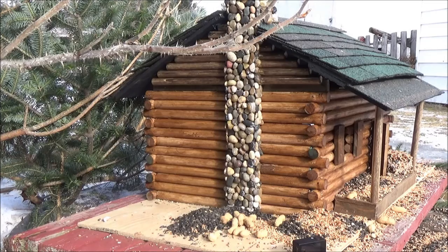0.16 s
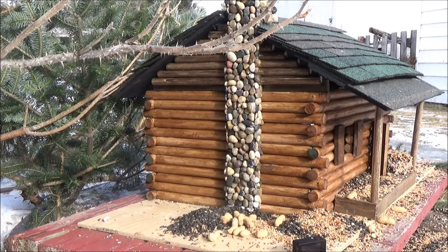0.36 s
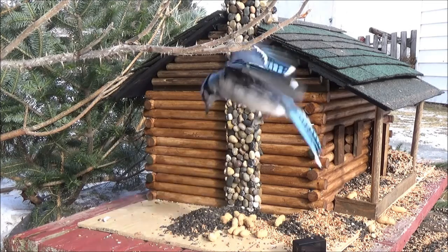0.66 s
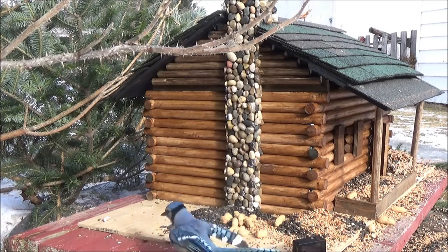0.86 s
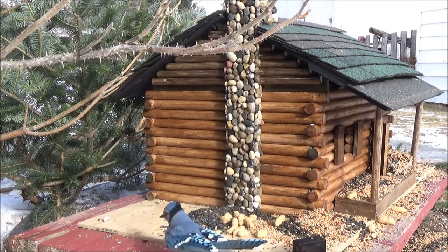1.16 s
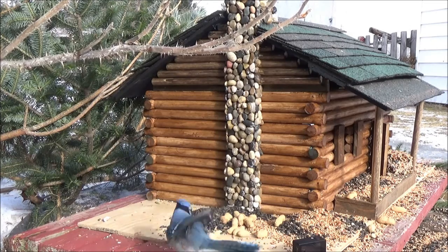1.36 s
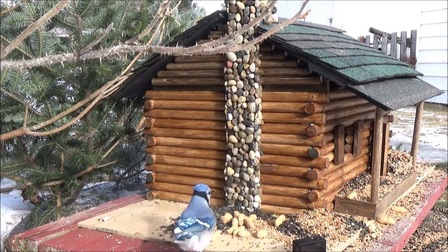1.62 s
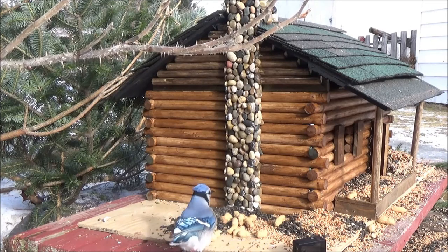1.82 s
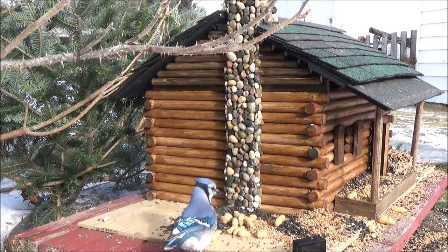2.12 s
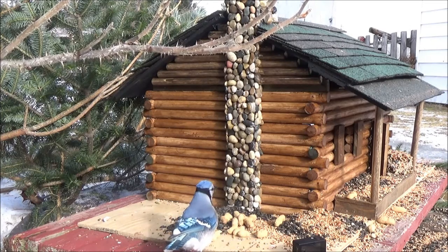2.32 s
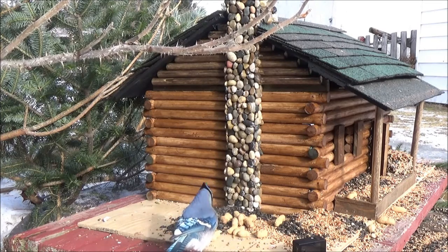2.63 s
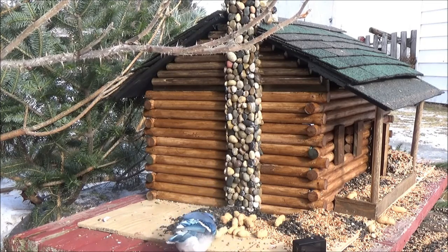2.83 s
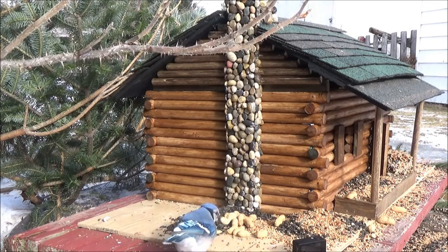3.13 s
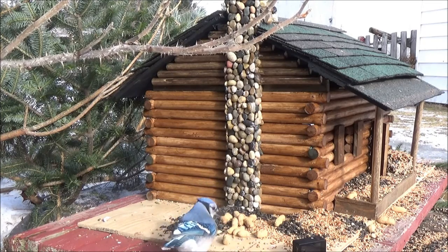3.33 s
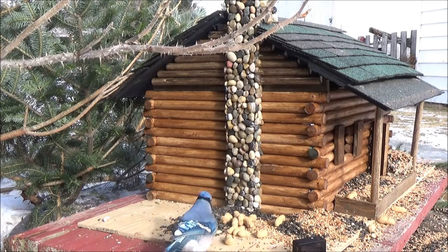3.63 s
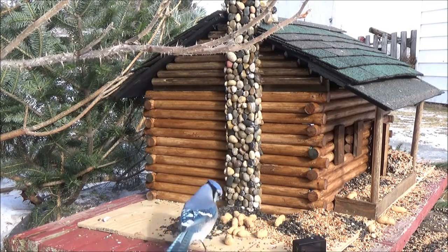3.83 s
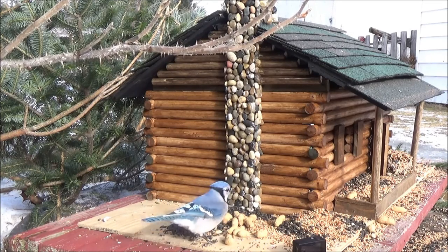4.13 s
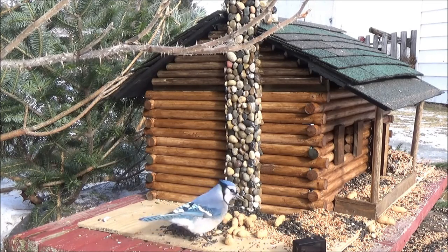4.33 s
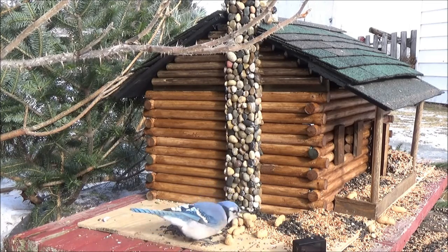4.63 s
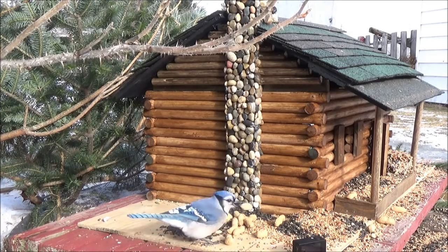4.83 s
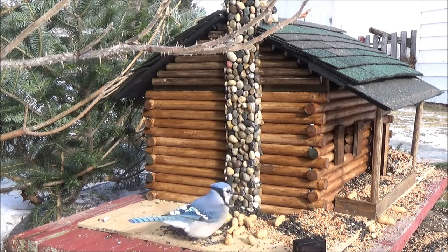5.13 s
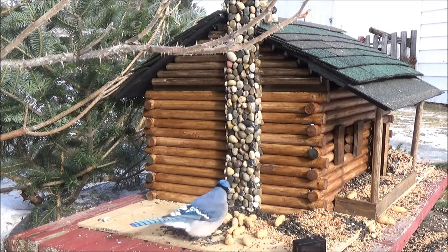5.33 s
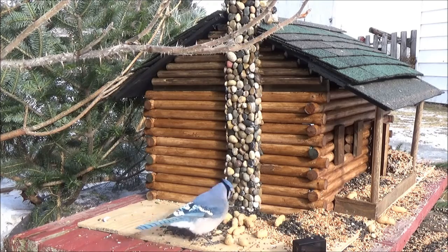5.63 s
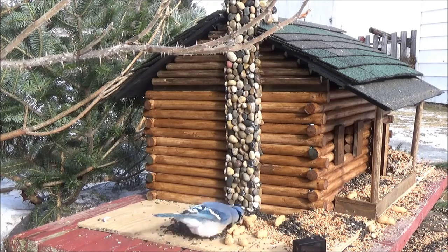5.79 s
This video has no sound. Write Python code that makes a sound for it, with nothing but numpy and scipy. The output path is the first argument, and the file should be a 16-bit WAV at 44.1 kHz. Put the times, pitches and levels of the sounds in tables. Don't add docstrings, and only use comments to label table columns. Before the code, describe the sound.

Outdoors, close stereo microphones pick up a bird's quick feathery wingbeats as it lands on a seed-strewn board. Sparse husk snaps and scuffs follow, with a faint rapid lens-motor ticking. Two very hard pecks crack, slightly distorted, then clusters of seed clicks, knocks and another loud peck. Far road noise fades gently behind, and the level dips after that late peck.

```python
import sys
import numpy as np
from scipy import signal
from scipy.fft import rfft, irfft
from scipy.io import wavfile

SR = 44100
rng = np.random.default_rng(int(sys.argv[2]) if len(sys.argv) > 2 else 0)


def master_out(mix):
    frames = np.transpose(np.atleast_2d(mix))
    ceiling = np.clip(frames, -1, 1)
    pcm = np.round(ceiling * 32767).astype(np.int16)
    wavfile.write(sys.argv[1], SR, pcm)


def magnitude_from_level(level_db):
    exponent = np.asarray(level_db, float) / 20
    return 10 ** exponent


N = 262836


def rms_one(x):
    return x / np.sqrt(np.mean(x ** 2) + 1e-20)


def peak_one(x):
    return x / (np.max(np.abs(x)) + 1e-20)


def at_hz(points, hz):
    table = np.array(points)
    return np.interp(np.log(hz), np.log(table[:, 0]), table[:, 1])


def drift(rate):
    hop = 40
    r = np.exp(-2 * np.pi * hop * rate / SR)
    source = rng.standard_normal(N // hop + 2002)
    slow = signal.lfilter([1], [1, -2 * r, r * r], source)[2000:]
    return np.interp(np.arange(N) / hop, np.arange(len(slow)), rms_one(slow))


# f/Hz, side minus mid level/dB
STEREO_WIDTH = [(60, -27), (180, -27), (310, -12), (700, -10), (1650, -4.5), (4000, -3.5), (8640, -7),
                (15000, -37)]


def coloured(spectrum, source=None, narrow_db=0):
    if source is None:
        source = rng.standard_normal((2, N))
    hz = np.maximum(np.fft.rfftfreq(N, 1 / SR), 1)
    low_edge = np.minimum(1, (hz / spectrum[0][0]) ** 4)
    high_edge = np.minimum(1, (spectrum[-1][0] / hz) ** 4)
    width = magnitude_from_level(at_hz(STEREO_WIDTH, hz) - narrow_db)
    gain = magnitude_from_level(at_hz(spectrum, hz)) * low_edge * high_edge * [np.ones_like(hz), width]
    mid, side = irfft(gain * rfft(source), N)
    return rms_one(np.array([mid + side, mid - side]))


def ring(clicks, hz, t60):
    r = magnitude_from_level(-60 / (t60 * SR))
    w = 2 * np.pi * hz / SR
    return signal.lfilter([0, np.sin(w)], [1, -2 * r * np.cos(w), r * r], clicks + 1e-18)


def swell(rise_s, fall_s, size, round_off=1):
    t = np.arange(size) / SR
    rise_s = max(rise_s, 1e-4)
    fall = np.maximum(t - rise_s, 0) / max(fall_s, 1e-4)
    rise = np.sin(np.pi / 2 * np.minimum(t / rise_s, 1)) ** 2
    return rise * np.exp(-fall ** round_off)


def add(out, s, piece):
    i = round(s * SR)
    out[..., i:i + piece.shape[-1]] += piece[..., :N - i]


def between(x, low_hz, top_hz):
    band = [low_hz, min(top_hz, .45 * SR)]
    return signal.sosfilt(signal.butter(2, band, "band", fs=SR, output="sos"), x)


def grains(per_s, spread_db, size):
    chance, big, sign = rng.random((3, size))
    height = magnitude_from_level(-spread_db * np.log(np.maximum(big, .01)))
    return (chance < per_s / SR) * height * np.sign(sign - .5)


# f/Hz, level/dB per Hz
ROAD = [(250, -11), (460, -8), (700, -1.5), (870, 1), (1050, -1.5), (1300, -7.5), (1800, -38)]
RUMBLE = [(25, -27), (47, -20), (60, -4), (75, -9), (155, 1), (230, -4.5), (400, -8.5), (600, -24)]
TYRES = [(800, -33), (1050, -6.5), (1300, 3), (1600, 0.5), (1850, -3.5), (2050, -8.5), (2400, -16),
         (3600, -34)]
HISS = [(1500, -4.5), (2500, 3.5), (4000, -1), (6500, -4), (9400, -5.5), (12500, -8.5), (15000, -9),
        (16500, -23.5)]
# f/Hz, bandwidth/Hz, level/dB
WHINE = [(7800, 120, -71), (9300, 296, -71), (60.4, 3.5, -76)]
# t/s, level/dB against its nearest
TRAFFIC = [
    (0, 1.5),
    (.3, -0.5),
    (.9, -.5),
    (1.4, -4),
    (2.2, -5),
    (2.85, -7.5),
    (3.6, -6),
    (4.3, -7.5),
    (4.9, -8),
    (5.96, -7),
]


def background():
    vehicle_db = np.interp(np.arange(N) / SR, *np.transpose(TRAFFIC))
    wash = np.zeros(N)
    add(wash, 0.57, swell(rise_s=0.3, fall_s=0.14, size=SR))

    def level(db, vehicle_share, wash_db):
        return db + vehicle_share * vehicle_db + wash_db * wash

    road_db = level(-44.5, 0.24, 3) + 0.51 * drift(13) + 0.5
    out = magnitude_from_level(road_db) * coloured(ROAD)
    rumble_db = level(-52, 0.28, 4.5) + 0.2
    out += magnitude_from_level(rumble_db) * coloured(RUMBLE)
    tyre_db = level(-41.5, 1, 0.7) + 0.26 * drift(11.0) + 1.0
    out += magnitude_from_level(tyre_db) * coloured(TYRES)
    hiss_db = level(-51, 0.18, 6.1) + 1.0 * drift(0.9) + 1.33
    out += magnitude_from_level(hiss_db) * coloured(HISS)
    for hz, width_hz, db in WHINE:
        out += magnitude_from_level(db) * rms_one(ring(rng.standard_normal(N), hz, 3.2 / width_hz))
    return out


HUSK_EDGES_HZ = 3100, 6200, 11000
# f/Hz, bandwidth/Hz, lift (ratio)
HUSK_DULL = [(3680, 1900, 1.0), (5050, 3000, 1), (5900, 1500, 0.98)]
HUSK_BRIGHT = [(7730, 1800, 1.37), (9250, 860, 1.05)]


def husks(contact):
    low_hz, split_hz, top_hz = HUSK_EDGES_HZ
    bands = [(split_hz, top_hz, HUSK_BRIGHT), (low_hz, split_hz, HUSK_DULL)]
    parts = []
    for bottom_hz, upper_hz, lifts in bands:
        wide = between(contact, bottom_hz, upper_hz)
        lifted = [lift * signal.lfilter(*signal.iirpeak(hz, hz / width_hz, fs=SR), wide)
                  for hz, width_hz, lift in lifts]
        parts.append(wide + sum(lifted))
    return parts


# t/s, rms level/dB, rise/s, fall/s
BRUSHES = [(0.035, -33.5, 0.0029, 0.01), (.062, -38, 0.0029, 0.0088), (.147, -50, .004, 0.0072),
           (0.174, -44, .003, 0.0079), (.853, -17.5, 0.004, .0075), (.885, -40.5, .0099, 0.049),
           (1.295, -33, 0.0055, 0.013), (1.375, -40, 0.012, 0.096), (1.965, -48, .004, .008),
           (2.025, -47, 0.0051, 0.011), (2.593, -38, 0.007, 0.011), (2.803, -46, .004, 0.016),
           (2.91, -43.5, 0.0032, 0.032), (3.82, -42.5, .03, 0.045), (4.654, -27, 0.0027, 0.0028),
           (4.722, -48, 0.0074, .0082), (4.978, -42, 0.003, 0.0049), (5.15, -46, .005, .03),
           (5.783, -36, .013, 0.0072), (5.814, -29, .0068, 0.0071)]
# t/s, rms level/dB of bright husk, dull husk, board, fall/s
SCUFFS = [(1.112, -47, -48, -55, .004), (1.44, -31, -31.5, -34, 0.0053), (1.531, -38, -34, -36, 0.012),
          (2.432, -59, -55, -52, .012), (3.0, -49.5, -55, -33.5, 0.011), (3.942, -28, -33, -27.5, 0.0044),
          (3.953, -40, -56, -38, 0.013), (3.980, -29, -33, -30.5, 0.0063), (4.448, -44, -43, -41, .012),
          (4.468, -42, -54, -36, 0.0094), (4.545, -35, -48, -33, .0068), (4.554, -29, -30, -27.5, .004),
          (4.743, -33, -36, -32, 0.0057), (5.826, -27, -20.5, -22, 0.0065), (5.836, -38, -30, -23.5, 0.016),
          (5.853, -41.5, -40, -43, 0.053), (5.905, -44, -36, -52, 0.012)]


def all_scuffs():
    dull_db, board_db = -5.5, -7
    light = [(s, db, db + dull_db, db + board_db, rise_s, fall_s) for s, db, rise_s, fall_s in BRUSHES]
    heavy = [(*row, 0.0032, fall_s) for *row, fall_s in SCUFFS]
    return sorted(light + heavy)


BOARD_LOW_HZ = 770


def scuffs():
    out = np.zeros(N)
    for s, bright_db, dull_db, board_db, rise_s, fall_s in all_scuffs():
        grit = grains(9000, 2.5, size=5000)
        bright, dull = husks(grit)
        mix = magnitude_from_level(bright_db) * rms_one(bright) + magnitude_from_level(dull_db) * rms_one(dull)
        mix += magnitude_from_level(board_db) * rms_one(between(grit, BOARD_LOW_HZ, 3600))
        add(out, s, magnitude_from_level(-2.0) * swell(rise_s, fall_s, size=5000) * mix)
    return out


def pushed_resonances(rows, split, share):
    out = np.zeros(N)
    push = swell(.0002, .0001, size=2500)
    for s, peak_db, hz, t60 in rows:
        note = sum(ring(push, hz * part / np.mean(split), share * t60) for part in split)
        add(out, s, magnitude_from_level(peak_db) * peak_one(between(note, hz / 2, hz * 2)))
    return out


# t/s, peak level/dB, f/Hz, t60/s
FLAPS = [(0.634, -24.5, 590, 0.0046), (.750, -29, 556, 0.036), (.750, -38, 910, 0.016),
         (.808, -26, 600, 0.022), (.858, -26, 1004, 0.075), (1.443, -29, 1180, 0.046),
         (.036, -24.5, 9900, 0.022), (.174, -37, 9460, .015), (2.436, -41, 6750, 0.043),
         (3.274, -7, 2180, 0.018), (3.274, -12, 3250, 0.038), (3.3015, -8, 1750, 0.02),
         (4.656, -25, 1700, 0.019), (5.007, -37, 460, 0.055), (5.828, -9.5, 5900, 0.024),
         (5.828, -33, 315, 0.042), (5.8265, -18.5, 895, 0.012), (5.775, -18, 1910, 0.022),
         (.444, -42, 620, .025),
    (0.691, -35, 550, .025),
    (.718, -34, 425, .03),
    (0.794, -39, 470, .02),
]


def flaps():
    return pushed_resonances(FLAPS, split=[1], share=1)


# t/s, rustle rms level/dB, bright edge level/dB against rustle, rise/s, fall/s
STROKES = [(.332, -40, 1, 0.024, 0.012), (.368, -46, -7, .012, 0.06), (0.411, -36.5, -5.5, 0.013, 0.017),
           (.432, -38.5, -10.5, 0.014, 0.05), (.486, -54, -3, .011, 0.081),
           (0.552, -36.5, -3, 0.031, 0.018), (.597, -38.5, -8, 0.017, 0.02),
           (0.633, -32.5, -3.5, 0.013, 0.03), (.675, -38, -5, 0.014, 0.037), (.711, -32.5, -1, .023, 0.012),
           (.740, -39.5, 3.5, .014, 0.02), (.772, -40, -4, 0.013, 0.026), (.804, -34.5, 0, .016, 0.023)]
# f/Hz, level/dB per Hz
FEATHERS = [(1300, -10), (2000, -5), (2900, -6), (4400, -4), (5800, -3.5), (7000, -5), (8500, -18.5)]
EDGES = [(6000, -25), (7500, -4), (9200, 3), (10500, 0.5), (12500, -3.5), (15000, -7), (16200, -18)]


def wings():
    rustle, edge, puff = np.zeros((3, N))
    for s, rustle_db, edge_db, rise_s, fall_s in STROKES:
        shape = swell(rise_s, fall_s, size=6000, round_off=1.7)
        add(rustle, s, magnitude_from_level(rustle_db) * shape)
        add(edge, s, magnitude_from_level(rustle_db + edge_db) * shape)
        add(puff, s, magnitude_from_level(rustle_db - 7) * shape)
    vanes = grains(10000, 1.9, size=2 * N).reshape(2, N) * magnitude_from_level(2.4 * drift(220))
    air = [(160, -27), (300, -1), (520, 1.0), (1000, -2.5), (1800, -7.0)]  # f/Hz, level/dB per Hz
    out = rustle * coloured(FEATHERS, vanes, narrow_db=36)
    out = out + edge * coloured(EDGES, vanes, narrow_db=0)
    return out + puff * magnitude_from_level(2.1 * drift(65)) * coloured(air, narrow_db=19)


# t/s, peak level/dB, f/Hz, t60/s
SLAPS = [(.352, -28, 9800, .012), (.428, -29, 10000, .01), (.576, -27, 9200, .01), (.580, -32, 6500, .01),
         (.645, -26, 4500, .012), (.716, -27, 6000, .01), (.733, -20, 8800, .015), (.737, -23, 5500, .012),
         (.810, -27, 9000, .012), (.823, -26, 9200, .015), (.899, -33, 8000, .012)]
# t/s, peak level/dB, f/Hz, t60/s
RINGS = [(3.2738, -22, 1230, 0.045), (3.2728, -11, 4870, .02), (3.2735, -6, 7850, .018),
         (3.273, -21, 10800, .01), (3.3015, -12.5, 1240, 0.068), (3.3012, -19, 2500, .03),
         (3.3008, -12, 3320, .03), (3.3007, -2.5, 7930, .025), (3.341, -27, 7900, .02),
         (3.946, -22, 10900, .01), (3.949, -26, 1310, .015), (3.953, -24, 4500, .012),
         (3.9835, -24, 7850, .012), (4.0065, -25, 4200, .012), (4.0145, -27, 5900, .01),
         (4.0548, -25, 3950, 0.013), (4.0795, -34, 7500, .006), (4.1165, -26, 3970, .012),
         (4.167, -22, 3880, .018), (4.532, -30, 9700, .015), (4.5433, -10, 6800, .008),
         (4.5432, -20, 4640, .008), (4.545, -24, 9700, .015), (4.552, -25, 9800, .012),
         (4.549, -28, 8000, .012), (4.6575, -27, 9900, .02), (4.660, -22, 7900, .015),
         (4.671, -22, 8700, .008), (4.743, -17, 7500, 0.057), (4.7455, -23, 9700, .02),
         (4.730, -35, 7800, .02), (4.733, -35, 7700, .015), (4.7125, -36, 8700, .006),
         (4.682, -36, 8400, .008), (5.0072, -10.5, 4100, .02), (5.0072, -10, 5140, .018),
         (5.0072, -17, 7500, .012), (5.0082, -13.5, 1700, 0.03), (5.0086, -17, 1210, .035),
         (5.0135, -22, 6930, .008), (5.7685, -25, 3800, .01), (5.773, -19, 5300, .01),
         (5.7755, -17, 3870, .012), (5.794, -32, 9200, .01), (5.833, -25, 9300, .012),
         (5.835, -29, 3600, .012), (5.8375, -25, 2000, .02), (5.842, -29, 6200, .015),
         (5.845, -29, 2500, .025), (5.847, -27, 4600, .015), (5.858, -33, 5600, .012),
         (5.927, -23.5, 4550, .03), (5.927, -32, 8800, .008),
         (3.279, -22, 8600, .012), (3.284, -26, 2500, .02), (3.288, -28, 3300, .015),
          (3.292, -23, 2150, .02), (3.296, -28, 4500, .01), (3.306, -24, 8800, .01),
          (3.310, -25, 2300, .015), (3.318, -29, 1500, .025), (3.329, -33, 3200, .025),
          (5.009, -21.5, 840, .03), (5.017, -33, 4000, .012), (5.855, -33, 1510, .03),
          (5.914, -36, 6000, .01)]
CLUSTER = [.972, 1, 1.021, 1.052]


def shells_and_tips():
    return pushed_resonances(SLAPS + RINGS, split=CLUSTER, share=.65)


# t/s, peak level/dB of bright crack, dull crack, board knock, contact/s
PECKS = [(0.6362, -33, -18, -22.5, 0.00084), (2.798, -28, -26, -24.5, 0.0025),
         (3.2723, -1.5, -8.5, -3.5, 0.0022), (3.3004, -1, -7.5, -2.5, 0.001),
         (3.339, -25, -26, -18.5, 0.0017), (3.9456, -20, -20, -27, 0.0019),
         (3.982, -17, -17.5, -27, 0.00092), (4.1666, -24, -21.5, -24, 0.0012),
         (4.4694, -27, -25, -32, 0.00082), (4.53, -27, -30, -31, 0.002), (4.5428, -8, -9.5, -21.5, 0.00095),
         (4.5605, -18, -21.5, -23, 0.00088), (4.656, -17.5, -28, -37, 0.00068),
         (4.661, -24, -28, -30, 0.00063), (4.742, -15.5, -31, -32, 0.0008),
         (4.9177, -19.5, -20, -23, .0012), (5.007, -5, -3, -16, 0.00077), (5.7733, -18.5, -17, -22, 0.0027),
         (5.818, -26, -24, -33, 0.00084), (5.8278, -16, -27, -20, 0.0022), (5.842, -21, -20, -31, 0.0015),
         (5.8466, -25, -17, -26, 0.00205), (5.9258, -30, -27, -33, 0.001)]
# t/s, peak level/dB, contact/s
SEEDS = [(0.8578, -29, 0.0027), (3.9455, -21, 0.0026), (3.9771, -12.5, 0.0007), (4.006, -24, 0.00071),
         (4.054, -26, 0.00033), (4.098, -31, 0.0016), (4.101, -32, 0.0016), (4.116, -29, 0.0011),
         (4.199, -30.5, 0.0012), (4.4477, -34, 0.002), (4.478, -20.5, 0.00023), (5.214, -33.5, 0.00052),
         (5.768, -20, 0.0012), (5.81, -28, 0.0014), (5.8705, -23, 0.00088)]
# t/s, peak level/dB, contact/s
KNOCKS = [(2.906, -23.5, 0.0019), (3.9933, -28, 0.0007), (4.03, -32, 0.00073), (4.0803, -31, 0.00044),
          (4.496, -37, 0.002), (4.681, -43, 0.0022), (5.0125, -22, 0.001), (5.0598, -27, 0.0025),
          (5.0706, -24.5, 0.00039), (5.1053, -21.5, 0.0028), (5.757, -30, .002)]
# t/s, peak level/dB, contact/s, left-right level/dB
SNAPS = [(0.9956, -27, 0.00057, -1.1), (1.023, -33, 0.00062, -4), (1.1164, -16.5, 0.00066, -.7),
         (1.2684, -34, .0004, -1.9), (1.2934, -23, 0.0022, -9), (1.3296, -31, 0.00051, -11),
         (1.44, -26, 0.0033, 0), (1.531, -25, 0.00076, -.5), (1.537, -23.5, 0.0033, 4),
         (3.0113, -14.5, 0.0012, -1.5), (3.209, -25, .0012, -2.5), (3.805, -30.5, .001, -4.6),
         (4.014, -21, 0.0012, 3.5), (4.039, -33, 0.00033, 2), (4.2032, -33, .0005, -4.7),
         (4.3196, -33.5, 0.0005, -5), (4.4253, -28, 0.0005, -7), (4.43, -32, .001, .1),
         (4.5398, -25, 0.00062, -15), (4.6714, -14.5, 0.00026, -.8), (4.7636, -24, 0.00026, 6),
         (4.975, -26.5, 0.00065, -5), (4.9851, -38, .00061, 1.3), (5.1433, -31, 0.0005, -1.1),
         (5.3854, -34, .0004, 3), (5.409, -31, 0.0016, -.7), (5.475, -20.5, 0.00011, -3),
         (5.6404, -30, 0.00047, -1.8), (5.834, -14, 0.0024, -3)]
# t/s, left-right level/dB
PERCH = [
    (.6, -.5),
    (3.3, 0.5),
    (3.95, -2),
    (4.2, 1.5),
    (4.55, 1.5),
    (4.9, 1),
    (5.0, 2),
    (5.8, 1),
]


def all_taps():
    seeds = [(s, db - 9.5, db, db - 11, contact_s) for s, db, contact_s in SEEDS]
    knocks = [(s, db - 11.5, db - 10.5, db, contact_s) for s, db, contact_s in KNOCKS]
    at_bird = [(*row, np.interp(row[0], *np.transpose(PERCH))) for row in seeds + knocks + PECKS]
    snaps = [(s, db, db - 10.5, db - 15, contact_s, pan_db) for s, db, contact_s, pan_db in SNAPS]
    return sorted(snaps + at_bird)


def struck(contact, modes, strength_db):
    return peak_one(sum(magnitude_from_level(db + own_db) * ring(contact, hz, t60)
                        for (hz, db, t60), own_db in zip(modes, strength_db)))


# f/Hz, level/dB, t60/s
BOARD = [(886, -35, 0.0041), (990, -45, 0.0082), (1200, 3, 0.022), (1490, 9, 0.0062), (1760, 7.5, 0.0078),
         (2060, 5, 0.0069), (2355, -6, 0.02), (2600, -10, 0.011), (3250, -9, 0.024)]


def taps():
    out = np.zeros((2, N))
    lead_s, lead_db = .003, -25
    size = 2000
    for s, bright_db, dull_db, knock_db, contact_s, pan_db in all_taps():
        noise = rng.standard_normal(size)
        shape = swell(0.72 * contact_s, contact_s, size, round_off=0.86)
        blow = signal.unit_impulse(size) * 4 + .5 * noise * shape
        knock = struck(blow, BOARD, 2.2 * rng.standard_normal(len(BOARD)))
        knock = between(between(knock, BOARD_LOW_HZ, 6200), 880, 6000)
        scrape = magnitude_from_level(lead_db) * swell(lead_s, contact_s, size)
        add(scrape, lead_s, shape[:size - round(lead_s * SR)])
        bright, dull = husks(noise * scrape)
        crack = magnitude_from_level(bright_db) * peak_one(bright) + magnitude_from_level(dull_db) * peak_one(dull)
        pan = magnitude_from_level(np.array([[.5], [-.5]]) * pan_db)
        add(out, s - lead_s, pan * crack)
        add(out, s + .45 * contact_s, magnitude_from_level(knock_db) * pan * peak_one(knock))
    return out


MOTOR_SKIPS = [7, 31, 39, 53, 67]
# t/s, level/dB
MOTOR_RETURN = [
    (.93, 1),
    (1.2, 3),
    (1.85, 3),
    (1.95, 0),
    (2.4, 0),
    (2.55, 1.5),
    (2.9, -0.5),
    (3.9, 0.5),
]


def lens_motor():
    start_s, steps_per_s, tone_hz = .9288, 29.97, 2952
    weak_steps, weak_db = [16, 76, 86], -7
    steps = np.delete(np.arange(90), MOTOR_SKIPS)
    at = ((start_s + steps / steps_per_s) * SR).astype(int)
    early = at - 240
    returning = steps % 2 == 1
    pull_db = returning * np.interp(at / SR, *np.transpose(MOTOR_RETURN))
    pull_db = pull_db + weak_db * np.isin(steps, weak_steps)
    kicks = np.zeros(N)
    kicks[at] = magnitude_from_level(pull_db + 1.2 * rng.standard_normal(len(at)))
    kicks[early] = .55 * magnitude_from_level(pull_db + 1.5 * rng.standard_normal(len(at)))
    kicks[at[returning]] *= -1
    kicks[early[returning]] *= -1
    tone = ring(ring(kicks, tone_hz, .034), tone_hz, 0.0018)
    tick = ring(kicks, 5100, 0.014) + ring(kicks, 2550, 0.0051)
    return magnitude_from_level(-41) * (rms_one(tone) * 0.17 + 0.22 * tick) * magnitude_from_level(np.array([[-1.4], [1.4]]))


def nearby_walls(x, t60_s, dull_hz, side_db):
    t = np.arange(round(.2 * SR)) / SR
    decay = magnitude_from_level(-60 * t / t60_s) * (t > .002)
    mid, side = rng.standard_normal((2, len(t))) * decay
    echoes = between([mid + magnitude_from_level(side_db) * side, mid - magnitude_from_level(side_db) * side], 270, dull_hz)
    echoes = echoes / np.sqrt(np.sum(echoes ** 2) / 2)
    return signal.fftconvolve(x, echoes, axes=1)[:, :N]


def scene():
    bird = wings() + flaps() + shells_and_tips() + scuffs() + taps()
    walls = magnitude_from_level(-17.0) * nearby_walls(bird, t60_s=0.081, dull_hz=7700, side_db=-4.5)
    return bird + walls + background() + lens_motor()


def band_limit(x):
    return signal.sosfilt(signal.butter(12, 16420, fs=SR, output="sos"), x)


def record(dry):
    heard = signal.sosfilt(signal.cheby2(20, 50, 16150, fs=SR, output="sos"), dry)
    duck_s, duck_db, duck_takes_s = 5.012, -6, 0.036
    since_peck = np.maximum(np.arange(N) / SR - duck_s, 0)
    heard = heard * magnitude_from_level(duck_db * (1 - np.exp(-since_peck / duck_takes_s)))
    overload = np.clip(heard, -1, 1) - heard
    soft_band = signal.butter(2, [45, 14500], "band", fs=SR, output="sos")
    heard = signal.sosfilt(soft_band, overload) + heard
    return band_limit(np.clip(heard, -1, 1))


dry = scene()
out = record(dry)
master_out(out)
```